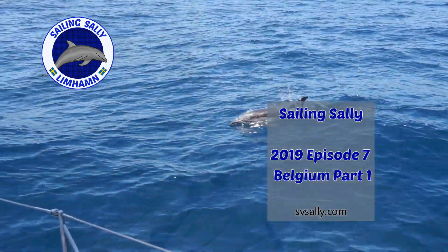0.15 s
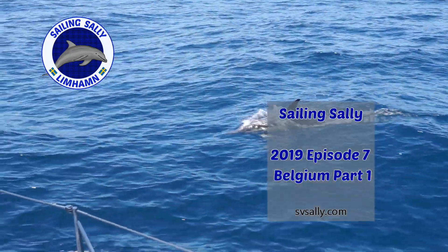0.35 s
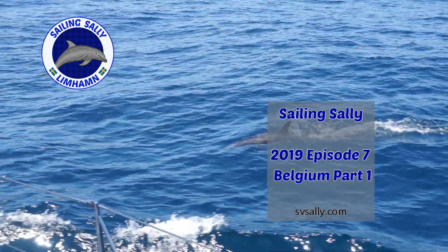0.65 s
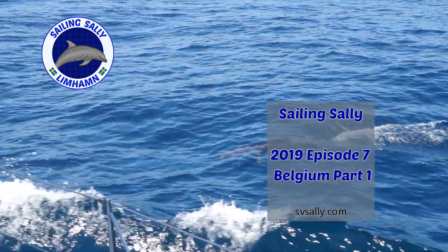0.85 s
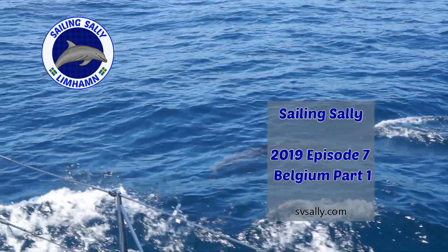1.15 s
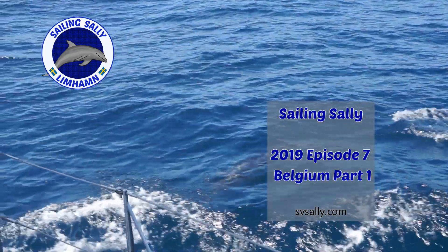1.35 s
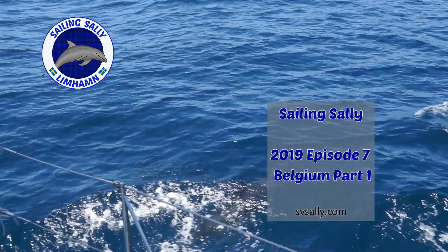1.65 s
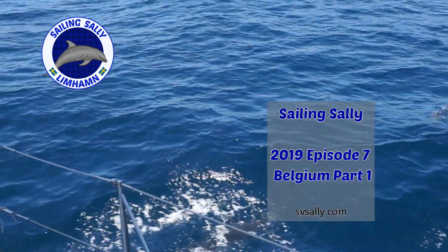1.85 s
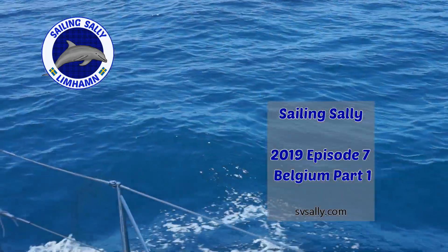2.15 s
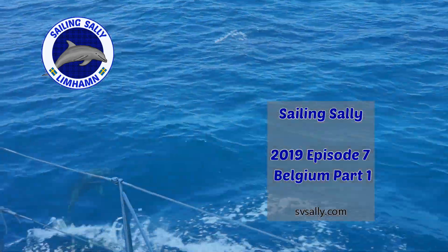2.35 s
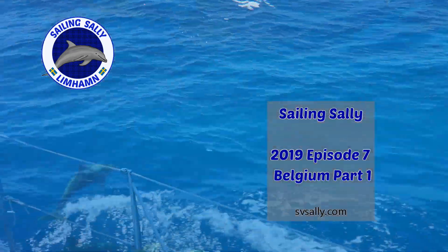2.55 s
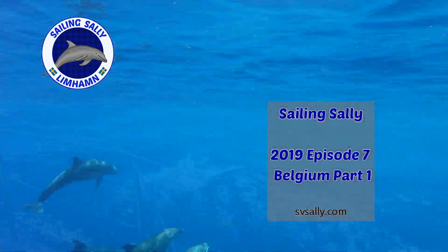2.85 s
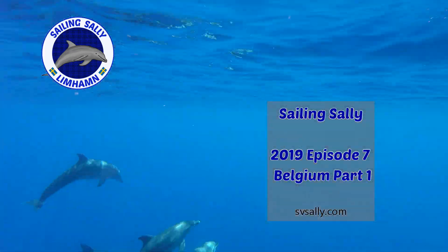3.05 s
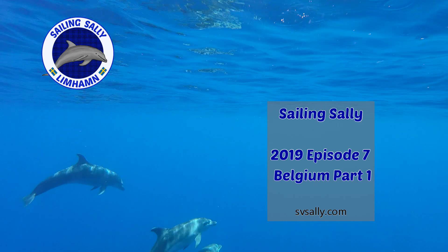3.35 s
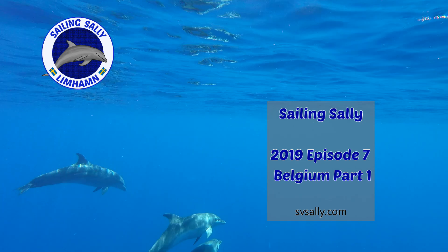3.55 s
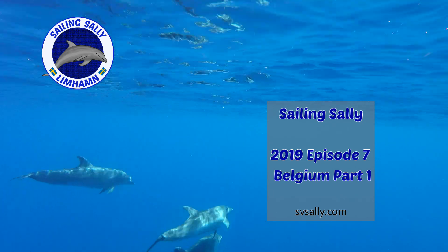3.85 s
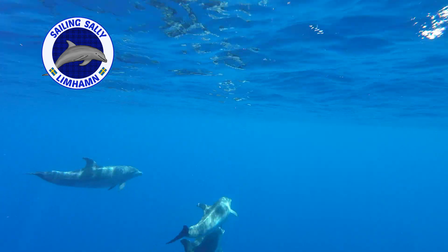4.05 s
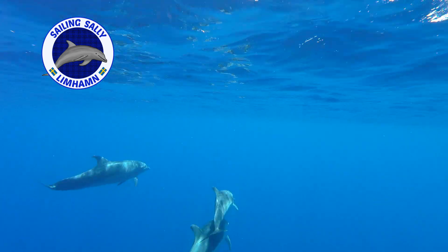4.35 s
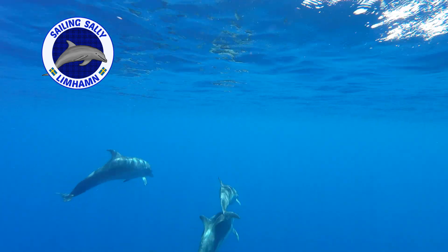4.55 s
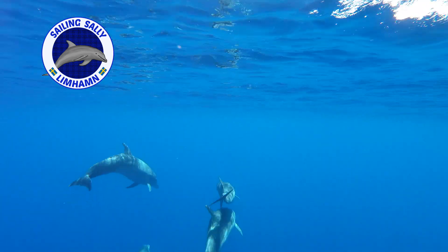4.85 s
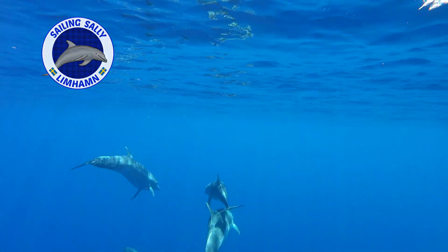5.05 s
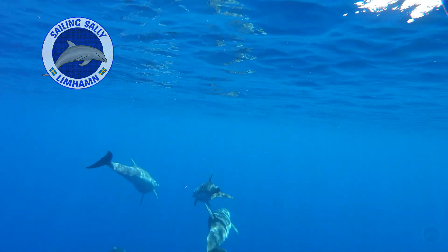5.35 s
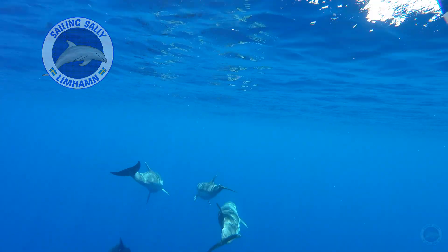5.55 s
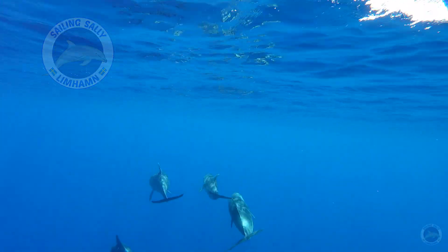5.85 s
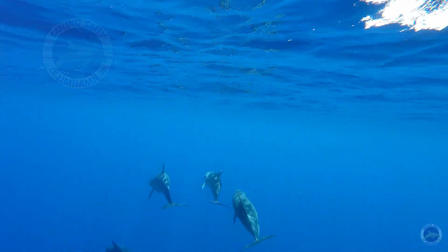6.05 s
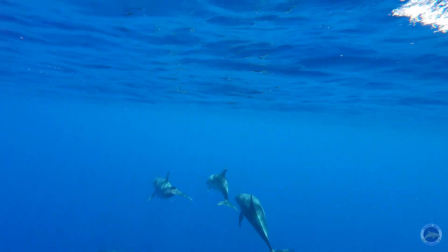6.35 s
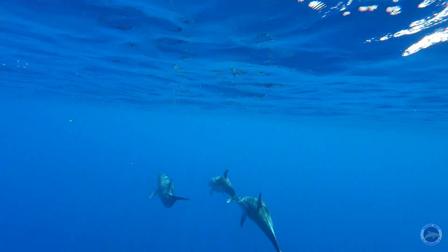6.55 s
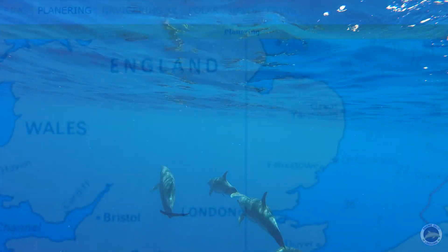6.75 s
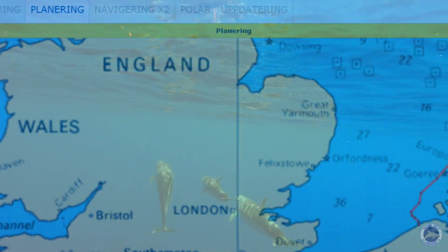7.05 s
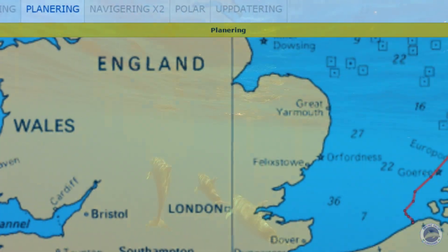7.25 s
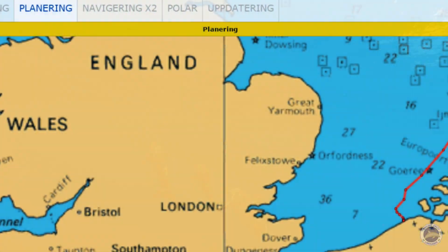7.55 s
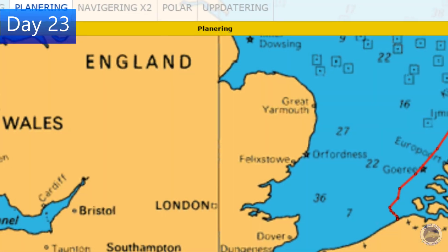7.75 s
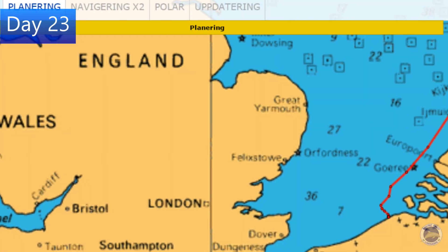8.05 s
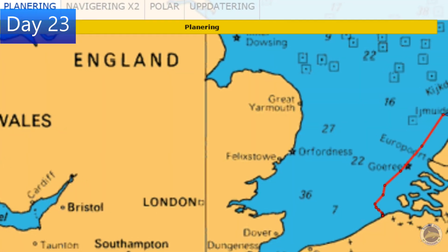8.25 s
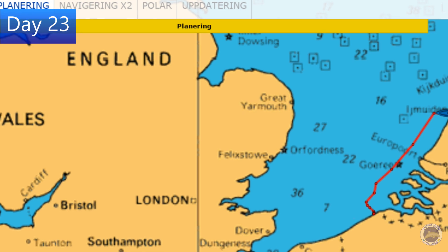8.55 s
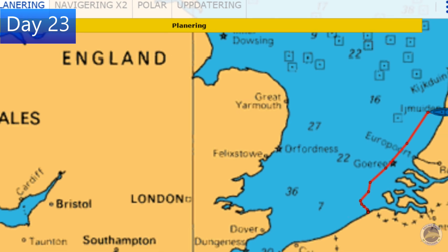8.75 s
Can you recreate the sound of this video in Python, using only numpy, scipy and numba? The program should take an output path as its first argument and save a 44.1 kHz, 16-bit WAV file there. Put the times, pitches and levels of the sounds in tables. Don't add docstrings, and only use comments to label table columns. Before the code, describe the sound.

On the deck of a moving yacht, a stereo microphone catches rushing foam, water slaps and crisp spray as crests break close by. The sound crossfades into a sealed underwater camera housing: mono, dark, low flow rumble and gurgling trapped air, small ticks, very faint dolphin clicks and whistles. Then an abrupt cut returns to smooth, wide, hissing foam along the hull with two low wind buffets near the end.

```python
import sys
import numpy as np
from scipy import signal
from scipy.fft import rfft, irfft, next_fast_len
from scipy.io import wavfile
from scipy.ndimage import uniform_filter1d
from numba import njit

SR = 44100
rng = np.random.default_rng(int(sys.argv[2]) if len(sys.argv) > 2 else 0)


def volts_from_decibels(level):
    exponent = np.asarray(level, float) / 20
    return 10 ** exponent


def bounce(signal):
    frames = np.transpose(np.atleast_2d(signal))
    limited = np.clip(frames, -1, 1)
    pcm = np.round(limited * 32767).astype(np.int16)
    wavfile.write(sys.argv[1], SR, pcm)


N = 392049
DIVE_S, UNDER_S, CUT_S = 1.93, 2.925, 7.622
JOIN_S = .002
STEP_S = .004


def along(table, hz):
    f, db = np.transpose(table)
    return np.interp(np.log(hz), np.log(f), db)


def level(x, db):
    return x * volts_from_decibels(db) / np.sqrt(np.mean(x ** 2) + 1e-30)


def tint(x, db_at):
    size = next_fast_len(x.shape[-1])
    hz = np.maximum(np.arange(size // 2 + 1) * SR / size, 1)
    return irfft(rfft(x, size) * volts_from_decibels(db_at(hz)), size)[..., :x.shape[-1]]


def butter(x, order, hz, kind):
    return signal.sosfilt(signal.butter(order, hz, kind, fs=SR, output="sos"), x)


def walk(n, rate):
    k = int(SR / rate)
    held = np.repeat(rng.standard_normal(n // k + 1), k)
    return 0.81 * uniform_filter1d(uniform_filter1d(held, k), k)[:n]


def swells(t, table):
    s, db, rise, fall = (c[:, None] for c in np.transpose(table))
    bells = np.exp(-((t - s) / np.where(t < s, rise, fall)) ** 2)
    return 10 * np.log10(1 + np.sum(volts_from_decibels(2 * db) * bells, axis=0))


def fade_db(t, start, end, power):
    return 20 * power * np.log10(np.clip((t - start) / (end - start), .001, 1))


@njit
def add(out, start, pole, glide, onset, size):
    for k in range(len(start)):
        z, p, i, gap = 1. + 0j, pole[k], start[k], 1.
        while abs(z) > .003 and i < out.shape[1]:
            z *= p
            p *= glide[k]
            gap *= onset[k]
            for c in range(out.shape[0]):
                out[c, i] += (z * size[c, k]).imag * (1 - gap) ** 2
            i += 1


def rings(n, s, hz, cycles, size, rise, soft):
    out, step = np.zeros((len(size), n)), hz / SR
    start = np.maximum(s * SR, 0).astype(np.int64)
    pole = np.exp(step * (2j * np.pi - np.log(1000) / cycles))
    glide = np.exp(2j * np.pi * rise * step ** 2 / cycles)
    add(out, start, pole, glide, np.exp(-step / soft), size + 0j)
    return out


def hits(n, table, cycles, rise, soft, trim_db):
    s, db, hz, pan_db = np.transpose(table)
    ports_db = db + trim_db + np.array([pan_db, -pan_db]) / 2
    return rings(n, s, hz, cycles, volts_from_decibels(ports_db), rise, soft)


def dive_rings(n, table, cycles, rise, soft, trim_db):
    s, db, hz = np.transpose(table)
    return rings(n, s - DIVE_S, hz, cycles, volts_from_decibels([db + trim_db]), rise, soft)[0]


def water(t0, t1, colour, side, centres_hz, s, curves_db, mean_from):
    n = int((t1 - t0) * SR)
    part = slice(int((mean_from[0] - t0) * SR), int((mean_from[1] - t0) * SR))
    swell = np.array([np.interp(t0 + np.arange(n) / SR, s, c) for c in curves_db])
    swell -= 10 * np.log10(np.mean(volts_from_decibels(2 * swell[:, part]), axis=1, keepdims=True))

    def swell_db(hz, at):
        place = np.interp(np.log(hz), np.log(centres_hz), np.arange(len(centres_hz)))
        return sum(np.clip(1 - abs(place - k), 0, 1) * row[at] for k, row in enumerate(swell))

    def rush(db, patchy_db, flicker_db, flicker_rate, burst_db):
        size = next_fast_len(n)
        hz = np.maximum(np.arange(size // 2 + 1) * SR / size, 1)
        noise = rfft(rng.standard_normal((2, size))) * volts_from_decibels(along(colour, hz))
        noise[1] *= volts_from_decibels(along(side, hz))
        out, shared = 0, walk(n, 3.6)
        burst = burst_db * walk(n, 28)
        for octave in np.arange(4, 14.6, .5):
            window = np.cos(np.pi * np.clip(np.log2(hz) - octave, -.5, .5)) ** 2
            before, shared = shared, walk(n, 4.8)
            wander = patchy_db * (before + shared) / np.sqrt(2)
            wander = wander + flicker_db * walk(n, flicker_rate) + burst
            band = irfft(noise * window, size)[:, :n]
            out = out + band * volts_from_decibels(swell_db(2 ** octave, slice(None)) + wander)
        return out * volts_from_decibels(db) / np.std(out[0, part])

    def bubbles(db, count, lo_hz, hi_hz, cycles, scatter_db, rise, soft):
        when, pitch, luck, turn, wide = rng.random((count, 5)).T
        loud_db = -scatter_db * np.log(.01 + luck)
        at = (when * n).astype(int)
        hz = np.broadcast_to(lo_hz, n)[at] * np.broadcast_to(hi_hz / lo_hz, n)[at] ** pitch
        size = hz * volts_from_decibels(along(colour, hz) + swell_db(hz, at) + loud_db)
        bearing = volts_from_decibels(along(side, hz)) * np.sqrt(2 * wide) * np.exp(2j * np.pi * turn)
        out = rings(n, at / SR, hz, cycles, np.array([size, size * bearing]), rise, soft)
        return out * volts_from_decibels(db) / np.std(out[0, part])

    return n, rush, bubbles


def left_right(mid_side, pan):
    ports = np.array([mid_side[0] + mid_side[1], mid_side[0] - mid_side[1]])
    return tint(ports, lambda hz: np.outer([.5, -.5], along(pan, hz)))


# (frequency [Hz], density [dB per Hz])
HISS_COLOUR = [(2470, -28.5), (4200, -1), (6870, -6), (14900, -12), (16000, -16.5)]


def housing_hiss(n):
    noise = tint(rng.standard_normal(n), lambda hz: along(HISS_COLOUR, hz))
    return level(noise * volts_from_decibels(1.8 * walk(n, 150)), -94)


def distant_crackle(n):
    when, pitch, luck = rng.random((90, 3)).T
    size = volts_from_decibels([-88 - 4 * np.log(.01 + luck)])
    return rings(n, when * n / SR, 4500 + 4000 * pitch, 5., size, rise=0, soft=.3)[0]


# (start [s], end [s], frequency [Hz], level [dB])
CLICK_TRAIN = (4, 5.5, 12998, -86)


def dolphin_clicks(n):
    start, end, hz, db = CLICK_TRAIN
    when, pitch = rng.random((60, 2)).T
    s = start + when * (end - start) - DIVE_S
    return rings(n, s, hz * (.9 + .2 * pitch), 40., volts_from_decibels([db + 0 * when]), rise=0, soft=3.)[0]


# (time [s], pitch [Hz], level [dB])
WHISTLE_CONTOURS = [
    [(4.13, 10109, -104), (4.29, 7750, -100), (4.404, 7169, -86), (4.47, 6800, -90), (4.5, 6400, -89),
     (4.54, 6200, -84), (4.55, 6317, -104)],
    [(4.545, 7200, -100), (4.565, 7300, -92), (4.58, 9000, -104)],
    [(4.85, 9900, -108), (4.912, 10523, -105), (4.95, 10000, -112), (4.98, 9700, -100), (5.05, 8600, -99),
     (5.075, 8300, -112), (5.11, 7950, -103), (5.17, 7400, -102), (5.19, 7300, -112)],
    [(5.205, 7150, -100), (5.282, 6822, -95), (5.316, 5986, -95), (5.35, 5896, -98), (5.37, 6700, -90)],
]


def dolphin_whistles(n):
    t, out = DIVE_S + np.arange(n) / SR, np.zeros(n)
    for contour in WHISTLE_CONTOURS:
        s, hz, db = np.transpose(contour)
        tone = np.sin(2 * np.pi * np.cumsum(np.interp(t, s, hz)) / SR) * np.sqrt(2)
        gain = volts_from_decibels(np.interp(t, s, db) + 3.5 * walk(n, 30))
        out += tone * gain * (t > s[0]) * (t < s[-1])
    return out


# (time [s], level [dB])
NEAR_TICKS = [(3.267, -70), (3.5219, -76), (3.6621, -63), (3.7888, -74), (4.7201, -72), (4.7471, -53),
              (4.8284, -76), (4.9227, -66), (5.0559, -52), (5.4011, -73), (5.905, -81), (6.1544, -78),
              (6.2911, -71), (6.33, -58), (6.4148, -69), (6.4462, -57), (6.4871, -71), (6.6118, -85),
              (6.6258, -67), (6.7061, -81), (6.7934, -76.5), (7.0204, -64), (7.2933, -72), (7.3562, -71),
              (7.4215, -73), (7.6086, -62)]


def near_ticks(n):
    s, db = np.transpose(NEAR_TICKS)
    return rings(n, s - DIVE_S, 4430 + 0 * s, 4.8, volts_from_decibels([db + 9]), rise=0, soft=.3)[0]


# (frequency [Hz], gain [dB])
FLOW_DIP = [(200, -0.5), (400, -2), (900, -2.5), (1300, 0)]


def housing_flow(rush, db):
    rumble = rush(db + 0.44, patchy_db=0.77, flicker_db=3.0, flicker_rate=16, burst_db=1.14)[0]
    return tint(rumble, lambda hz: along(FLOW_DIP, hz))


# (time [s], resonance [Hz])
CAVITY_PITCH = [(2.901, 578.5), (2.989, 810), (3.4, 586), (3.61, 765), (3.659, 490), (4.25, 767),
                (4.27, 637), (5.77, 694), (5.88, 516), (6.089, 720), (7.15, 781), (7.31, 541), (7.6, 721)]
# (time [s], level [dB], resonance [Hz])
AIR_GULPS = [(2.407, -29, 687), (2.606, -26, 823), (2.679, -24.5, 420), (2.749, -24, 540),
             (2.837, -33, 685), (2.98, -27.5, 789), (3.023, -28, 697), (3.094, -27, 778), (3.118, -25, 732),
             (3.147, -32, 483), (3.418, -28.5, 470), (3.58, -30, 708), (3.625, -31, 721),
             (3.661, -17.5, 428), (3.798, -24.5, 448), (3.845, -29, 434), (3.875, -28, 507),
             (3.898, -26, 650), (3.984, -26, 570), (4.031, -25.5, 684), (4.1, -24, 694),
             (4.212, -20.5, 820), (4.272, -21.5, 640), (4.372, -25, 680), (4.413, -29.5, 804),
             (4.445, -25, 710), (4.524, -25.5, 572), (4.597, -24, 601), (4.645, -21.5, 573),
             (4.696, -30, 646), (4.737, -22, 860), (4.827, -24, 651), (4.92, -22, 846), (5.056, -20, 716),
             (5.08, -25.5, 773), (5.263, -25, 654), (5.383, -30, 634), (5.401, -26, 520),
             (5.538, -27.5, 670), (5.572, -27, 789), (5.751, -22.5, 682), (5.961, -26.5, 570),
             (6.018, -25, 693), (6.234, -21, 650), (6.29, -23, 666), (6.395, -20, 747), (6.445, -29, 784),
             (6.483, -24.5, 681), (6.642, -24.5, 858), (6.7, -25, 875), (6.99, -26, 786), (7.019, -21, 750),
             (7.065, -26, 846), (7.115, -27.5, 767), (7.176, -22, 798), (7.198, -33, 512),
             (7.254, -27, 540), (7.317, -21, 438), (7.503, -21.5, 626), (7.594, -25, 800)]
# (time [s], level [dB], resonance [Hz])
BIG_GLUGS = [(2.127, -38, 397), (2.678, -22, 417), (3.66, -26, 433), (3.842, -22, 434), (4.287, -31.5, 357),
             (4.854, -31.5, 378), (5.579, -29.5, 396), (5.782, -26.5, 402), (5.897, -29.5, 245),
             (7.144, -35, 299), (7.289, -28, 220), (7.374, -26.5, 258)]
# (time [s], level [dB], resonance [Hz])
BUBBLE_PIPS = [(3.0062, -30, 1950), (3.073, -24, 1646), (3.5995, -25, 1370), (3.7183, -26.5, 1580),
               (3.829, -34, 2000), (4.0777, -29, 1340), (4.8817, -33.5, 2360), (5.1313, -29.5, 2070),
               (5.3903, -26.5, 1500), (5.54, -32, 2460), (5.987, -24.5, 1370), (6.3102, -27, 1480),
               (6.4431, -24, 1226), (6.826, -21, 1150), (7.1355, -27, 1620), (7.261, -30, 1775),
               (7.4745, -26, 1940)]
# (time [s], level [dB], resonance [Hz])
WALL_PINGS = [(2.925, -36.5, 2040), (3.0066, -39, 2180), (3.5997, -30, 1890), (3.8307, -39, 2050),
              (4.0787, -42.5, 1870), (4.4613, -43.5, 2470), (4.8847, -42, 2400), (5.047, -35.5, 2150),
              (5.1323, -38.5, 1990), (5.243, -38, 2390), (5.4575, -36, 1800), (5.5407, -41, 2450),
              (5.5748, -36, 2360), (5.8037, -40, 2090), (5.889, -39, 2560), (6.0068, -44, 2450),
              (6.117, -37.5, 2370), (6.1604, -35.5, 2170), (6.2492, -38, 2120), (6.2777, -38, 2140),
              (6.3191, -33, 2070), (6.3714, -49, 2220), (6.446, -32, 1930), (6.712, -41, 2460),
              (6.8005, -36, 1890), (7.0015, -40, 2250), (7.0554, -41, 2270), (7.136, -37, 1840),
              (7.2175, -41, 2140), (7.2794, -32, 1830), (7.3497, -35, 1920), (7.4744, -37, 2040),
              (7.5518, -42, 2020), (7.6091, -35, 1910)]
# (time [s], level [dB], resonance [Hz])
POCKET_SNAPS = [
    (3.83, -37, 1500),
    (5.056, -36, 1300),
    (5.401, -31, 1490),
    (5.801, -37, 1600),
    (6.446, -27.5, 1190),
    (7.136, -33, 1580),
]


def trapped_air(n, bubbles, db):
    spread = 1.3
    hz = np.interp(DIVE_S + np.arange(n) / SR, *np.transpose(CAVITY_PITCH))
    air = bubbles(db - 9.5, count=600, lo_hz=hz / spread, hi_hz=hz * spread, cycles=44,
                  scatter_db=2.5, rise=.3, soft=2)[0]
    air += bubbles(db - 22.5, count=1500, lo_hz=1050, hi_hz=3200, cycles=32,
                   scatter_db=2.2, rise=.12, soft=2.5)[0]
    air += dive_rings(n, AIR_GULPS, cycles=30., rise=0.18, soft=0.43, trim_db=2.5)
    air += dive_rings(n, BIG_GLUGS, cycles=35., rise=0.34, soft=0.78, trim_db=3.5)
    air += dive_rings(n, BUBBLE_PIPS, cycles=33., rise=0.073, soft=2.4, trim_db=1.0)
    air += dive_rings(n, WALL_PINGS, cycles=26., rise=.06, soft=2.8, trim_db=8.0)
    air += dive_rings(n, POCKET_SNAPS, cycles=5.4, rise=.2, soft=0.15, trim_db=7.5)
    return butter(air, 8, 3200, "low")


def ride_gain(flow, db):
    power = uniform_filter1d(uniform_filter1d(flow ** 2, 900), 900)
    return flow * np.maximum(power / volts_from_decibels(2 * db), 1) ** -.25


# (time [s], amount [dB], fine against coarse bubbles [dB])
DRAGGED_AIR = [(2.85, -35.5, -13.5), (3.08, -31, -15), (3.4, -31.5, -18), (3.62, -31.5, -16),
               (3.95, -33, -16.5), (4.25, -31.5, -23.5), (4.6, -36.5, -15.5), (4.9, -34, -17),
               (5.4, -36, -13.5), (5.75, -31, -18.5), (5.92, -35.5, -15.5), (6.3, -31, -17.5),
               (6.65, -33, -15.5), (6.85, -34, -13), (7.1, -34.5, -13), (7.6, -32.5, -15.5)]
# (peak [s], level [dB], rise [s], fall [s])
SWELL_SURGES = [
    (2.979, 7.5, 0.52, .3),
    (3.25, 9, .08, .08),
    (3.599, 6, 0.22, 0.19),
    (4.75, 8, 0.48, 0.45),
    (5.45, 7, .1, 0.093),
    (5.9, 11, 0.27, 0.18),
    (6.1, 10, .06, .06),
    (7.402, 19.5, .2, 0.21),
]
# (peak [s], level [dB], half length [s])
FROTH_CLOUDS = [(3.062, 1, .05), (3.248, 3.5, 0.079), (3.42, 1, 0.077), (3.603, 4, 0.054),
                (3.757, 5.5, 0.053), (3.96, -5.5, 0.027), (4.162, 7.5, 0.038), (4.485, 3.5, .04),
                (4.743, 2.5, 0.055), (4.879, -1, .03), (5.045, 1.5, 0.013), (5.257, 0.5, 0.022),
                (5.328, 7, .02), (5.558, 0.5, 0.057), (5.882, 1.5, .04), (6.01, 3.5, 0.016),
                (6.18, 9, 0.037), (6.319, 3.5, 0.027), (6.389, 5, 0.013), (6.595, 1.5, .03),
                (6.78, 4.5, 0.045), (6.905, 5, 0.018), (7.276, 5, 0.036), (7.382, 5.5, 0.034),
                (7.487, 2.5, 0.04)]
# (frequency [Hz], density [dB per Hz])
DIVE_SPECTRUM = [(11, -26.5), (18, -4), (69, 2), (128, -5), (160, -12), (238, -12.5), (303, -13),
                 (440, -14.5), (748, -14.5), (932, -15.5), (1020, -22.5), (1330, -31.5), (1850, -38),
                 (2400, -38), (2810, -46), (3500, -61.5), (4550, -90), (7700, -120)]


def under_water():
    db = -29.5
    s = np.arange(DIVE_S, CUT_S, STEP_S)
    when, air_db, fine_db = np.transpose(DRAGGED_AIR)
    surge = swells(s, SWELL_SURGES)
    coarse, fine = np.interp(s, when, air_db), np.interp(s, when, air_db + fine_db)
    fine += swells(s, np.array(FROTH_CLOUDS)[:, [0, 1, 2, 2]])
    curves = np.array([-0.13 * surge, .05 * surge, surge, coarse + 0.2 * surge, coarse, fine])
    curves += fade_db(s, DIVE_S, UNDER_S, 1)
    mono = [(20, -120), (20000, -120)]
    n, rush, bubbles = water(DIVE_S, CUT_S + JOIN_S, DIVE_SPECTRUM, mono,
                             [60, 140, 250, 450, 800, 2000], s, curves, (3.0, 7.6))
    flow = ride_gain(trapped_air(n, bubbles, db) + housing_flow(rush, db), db)
    ticks = near_ticks(n) + distant_crackle(n) + dolphin_clicks(n)
    t = np.arange(n) / SR
    ends = np.clip(np.minimum(t / .2, t[::-1] / .0005), 0, 1)
    return ends * (flow + ticks + housing_hiss(n) + dolphin_whistles(n))


# (time [s], level [dB], frequency [Hz], left minus right [dB])
WIND_THUMPS = [
    (8.727, -27.5, 167, -6),
    (8.859, -27, 155, -5),
]


def wind_thumps(n):
    table = np.subtract(WIND_THUMPS, [CUT_S, 0, 0, 0])
    return hits(n, table, cycles=17.0, rise=0.14, soft=1.2, trim_db=4.5)


# (frequency [Hz], density [dB per Hz])
HULL_SPECTRUM = [(15, -60), (25, -18), (102, -1.5), (241, 2), (449, -1), (710, -3), (1060, -3.5),
                 (1280, -7.5), (2520, -12), (4820, -20), (8270, -22), (11100, -17.5), (15800, -22)]
# (frequency [Hz], side minus mid [dB])
HULL_WIDTH = [(60, -6), (110, -7), (200, -2.5), (380, -5.5), (700, -7.5), (1290, -4), (2380, 1.5),
              (4400, 4.5), (8120, 4), (15000, -2)]
# (frequency [Hz], left minus right [dB])
HULL_BALANCE = [(60, -2), (110, -0.5), (200, 2), (380, -0.9), (700, -0.5), (1290, 0), (2380, -2.0),
                (4400, -2.2), (8120, -2.0), (15000, -1.5)]
# (peak [s], level [dB], rise [s], fall [s])
FOAM_SURGES = [
    (8.0, -4, 0.1, 0.27),
    (8.56, 8.5, 0.22, 0.28),
]
FOAM_FOLLOW = (0.17, 0.58, 1.13)
# (peak [s], level [dB], rise [s], fall [s])
WIND_GUSTS = [
    (7.7, 8, .03, 0.016),
    (8.4, 1.5, 0.11, 0.18),
    (8.75, 15.5, 0.037, 0.029),
    (8.865, 12, 0.029, 0.028),
]


def hull_wash():
    db = -36
    s = np.arange(CUT_S, N / SR, STEP_S)
    curves = [swells(s, WIND_GUSTS), *np.outer(FOAM_FOLLOW, swells(s, FOAM_SURGES))]
    n, rush, bubbles = water(CUT_S, (N + 2) / SR, HULL_SPECTRUM, HULL_WIDTH,
                             [170, 700, 2500, 8500], s, curves, (7.64, 8.89))
    foam = rush(db + 2.5, patchy_db=1.5, flicker_db=1.0, flicker_rate=20.34, burst_db=2.34)
    foam += bubbles(db - 8, count=1500, lo_hz=300, hi_hz=4000, cycles=20, scatter_db=2, rise=.25, soft=1.2)
    foam += bubbles(db - 14, count=3000, lo_hz=4000, hi_hz=15000, cycles=14, scatter_db=2, rise=.1, soft=.8)
    return butter(left_right(foam, HULL_BALANCE) + wind_thumps(n), 2, 45, "high")


# (time [s], level [dB], frequency [Hz], left minus right [dB])
SPRAY_DROPS = [(0.0248, -28, 11200, -2.0), (0.2244, -29, 4270, -1.0), (0.269, -25, 7310, -2.0),
               (0.349, -17.5, 6090, 0.0), (0.4449, -22, 6410, -1.5), (0.704, -32, 9120, 1.5),
               (0.8367, -27, 4240, -1.5), (0.9697, -30, 5020, 0.5), (1.0904, -26, 7460, -1.5),
               (1.142, -22, 9170, -2.0), (1.2321, -19, 5700, -4.5), (1.2885, -14, 10900, -8),
               (1.331, -19.5, 6120, -7), (1.4636, -31, 11300, -0.5), (1.508, -32, 4160, -2.0),
               (2.173, -23, 12500, -1.5), (2.5412, -27.5, 6090, -1.5), (2.633, -36, 5060, -4)]
# (time [s], level [dB], frequency [Hz], left minus right [dB])
WATER_SLAPS = [(0.028, -29, 510, -6), (0.155, -32, 666, 1.5), (0.226, -25, 685, 4), (0.377, -22, 580, -0.5),
               (0.742, -26, 866, 7), (0.841, -22, 990, 6), (0.995, -21.5, 750, 5), (1.273, -23.5, 1170, 2),
               (1.312, -23, 1550, 11.5), (1.338, -14.5, 845, -0.5), (1.465, -28.5, 845, 4.5),
               (1.553, -31, 1020, 2.5), (1.804, -30.5, 600, -0.5), (1.941, -38, 920, 11)]
# (time [s], level [dB], frequency [Hz], left minus right [dB])
CREST_POCKETS = [(0.399, -24, 580, 2.5), (0.519, -21.5, 615, -1), (0.629, -26, 710, 1.5),
                 (0.689, -23, 760, 6), (0.759, -19, 1520, 1.5), (0.776, -21, 1730, 2.0),
                 (0.786, -22, 1570, 2.5), (0.889, -17, 2090, 3.5), (0.941, -22, 708, 6),
                 (1.159, -25, 1970, 2.0), (1.224, -23, 821, 1.0)]
# (time [s], level [dB], frequency [Hz], left minus right [dB])
HOLLOW_KNOCK = [
    (0.036, -27.5, 560, 0),
    (0.045, -28.5, 3150, -7),
    (0.038, -32, 2900, -2),
]
# (time [s], level [dB], frequency [Hz], left minus right [dB])
FLAT_SMACK = [
    (1.34, -5.5, 1166, -0.5),
]


def crest_blows(n):
    cracks = np.multiply(WATER_SLAPS, [0.88, 2.8, 4.3, 1])
    blows = hits(n, SPRAY_DROPS, cycles=13, rise=.1, soft=0.19, trim_db=2.5)
    blows += hits(n, WATER_SLAPS, cycles=21.9, rise=0.15, soft=0.055, trim_db=-2.0)
    blows += hits(n, cracks, cycles=6.7, rise=.1, soft=.2, trim_db=-2.0)
    blows += hits(n, CREST_POCKETS, cycles=10.0, rise=0.17, soft=.3, trim_db=1.5)
    blows += hits(n, HOLLOW_KNOCK, cycles=96, rise=0.043, soft=3.4, trim_db=1.5)
    blows += hits(n, FLAT_SMACK, cycles=3.3, rise=.2, soft=0.31, trim_db=3.0)
    return butter(blows, 2, 350, "high")


# (frequency [Hz], density [dB per Hz])
BOW_SPECTRUM = [(15, -59.5), (25, -26), (102, -8), (137, -8), (284, -1), (352, -3.5), (414, -5),
                (473, -4.5), (604, -1), (1820, -4), (4690, -11.5), (10800, -13.5), (15800, -17)]
# (frequency [Hz], side minus mid [dB])
BOW_WIDTH = [(60, -7.5), (110, -4.5), (200, -8.5), (380, -12), (700, -13), (1290, -7), (2380, -2),
             (4400, 0.5), (8120, -1.5), (15000, 1)]
# (frequency [Hz], left minus right [dB])
BOW_BALANCE = [(60, 6), (110, -6), (200, -1), (380, -2.5), (700, 1.5), (1290, -1.5), (2380, -1),
               (4400, -1.5), (8120, -4.5), (15000, -3.5)]
# (peak [s], level over the wash [dB], rise [s], fall [s])
BREAKING_CRESTS = [(0.055, 9.5, 0.017, 0.02), (0.25, 9, 0.052, 0.22), (0.4, 10, 0.055, 0.27),
                   (0.6, 5.5, 0.042, 0.093), (0.788, 13, 0.08, 0.071), (0.885, 7.5, 0.061, 0.044),
                   (1.05, 7.5, 0.13, 0.11), (1.16, 12, 0.038, 0.031), (1.24, 10, 0.041, 0.011),
                   (1.33, 14, 0.069, 0.025), (1.39, 4.5, 0.028, 0.077), (1.67, 0.5, 0.063, .1),
                   (2.17, -2, .08, 0.16), (2.439, 8.5, 0.086, 0.12)]
CREST_FOLLOW = (0.1, 0.91, 1.08, 0.86)
# (time [s], loss [dB], rise [s], fall [s])
BOW_LIFT = [
    (1.35, 9.5, 0.2, .22),
]


def bow_wave():
    db, lean_db = -36, 2.5
    s = np.arange(0, UNDER_S, STEP_S)
    curves = np.outer(CREST_FOLLOW, swells(s, BREAKING_CRESTS)) + fade_db(s, UNDER_S, DIVE_S, 0.69)
    curves[0] -= swells(s, BOW_LIFT)
    n, rush, bubbles = water(0, UNDER_S, BOW_SPECTRUM, BOW_WIDTH,
                             [110, 600, 2500, 8500], s, curves, (0, 2.0))
    foam = rush(db - 2.5, patchy_db=1.74, flicker_db=1.05, flicker_rate=27, burst_db=1.44)
    foam += bubbles(db - 4, count=3500, lo_hz=400, hi_hz=3500, cycles=24, scatter_db=2.5, rise=.3, soft=1.2)
    foam += bubbles(db - 8.5, count=5000, lo_hz=3500, hi_hz=15000, cycles=14, scatter_db=3, rise=.1, soft=.8)
    wave = left_right(foam, BOW_BALANCE) * volts_from_decibels(np.array([[lean_db], [-lean_db]]) / 2)
    return butter(wave + crest_blows(n), 2, 40, "high")


def scene():
    out, t = np.zeros((2, N)), np.arange(N) / SR
    join = np.clip((t - CUT_S) / JOIN_S, 0, 1)
    parts = ((0, bow_wave(), 1),
             (DIVE_S, under_water(), np.sqrt(1 - join)),
             (CUT_S, hull_wash(), np.sqrt(join)))
    for s, part, gain in parts:
        out += gain * np.pad(np.atleast_2d(part), ((0, 0), (int(s * SR), N)))[:, :N]
    return out


def low_pass(x):
    return signal.sosfilt(signal.butter(12, 17010, fs=SR, output="sos"), x)


def record(dry):
    top_cut = signal.ellip(10, .2, 80, 15850, fs=SR, output="sos")
    mix = signal.sosfilt(top_cut, dry)
    return low_pass(mix)


dry = scene()
out = record(dry)
bounce(out)
```